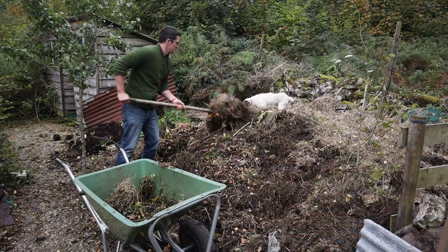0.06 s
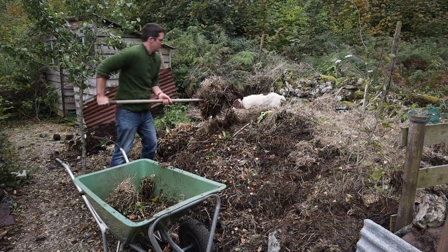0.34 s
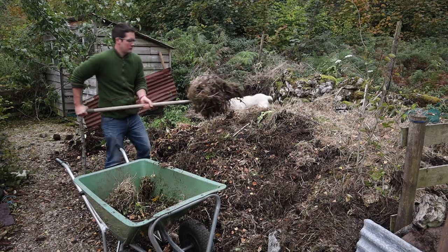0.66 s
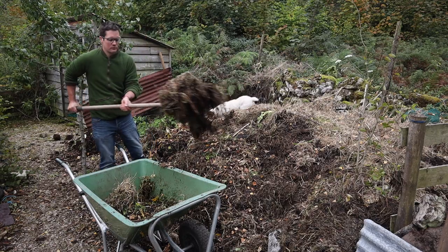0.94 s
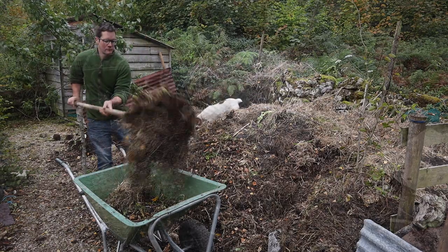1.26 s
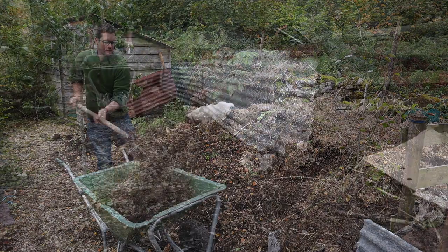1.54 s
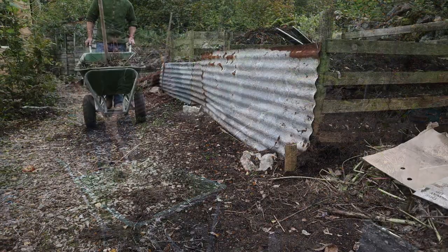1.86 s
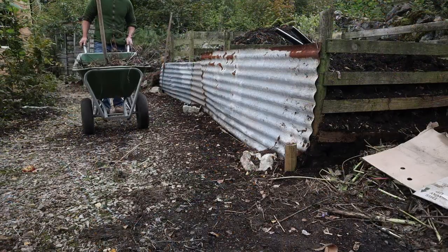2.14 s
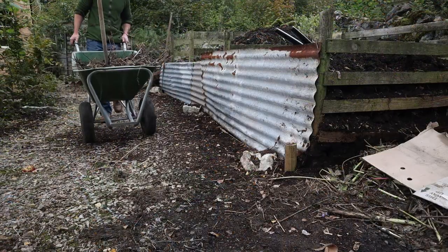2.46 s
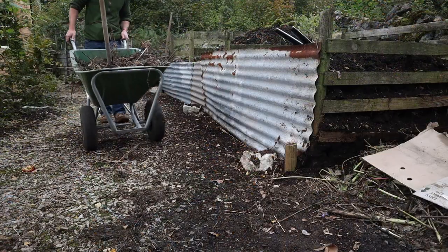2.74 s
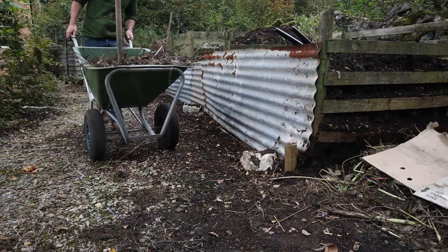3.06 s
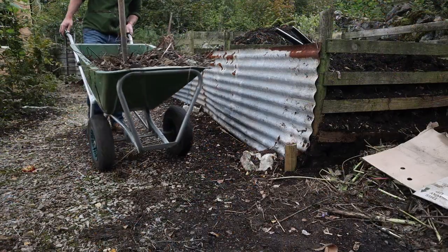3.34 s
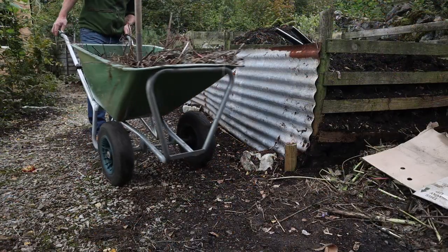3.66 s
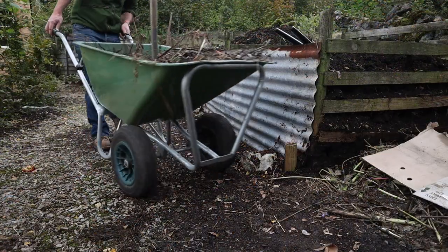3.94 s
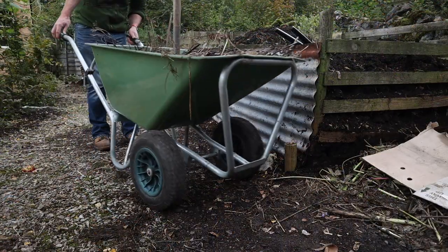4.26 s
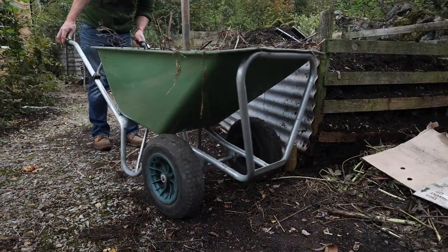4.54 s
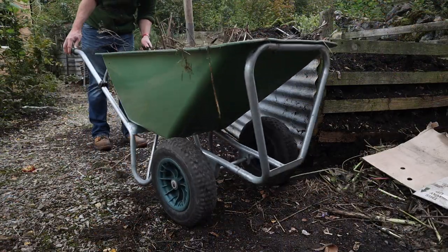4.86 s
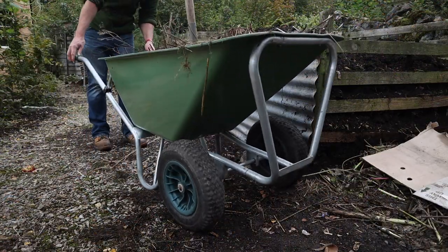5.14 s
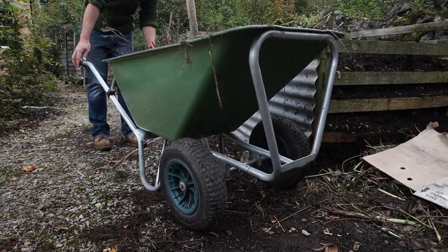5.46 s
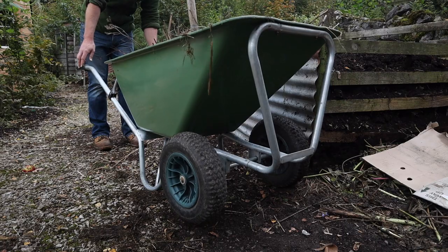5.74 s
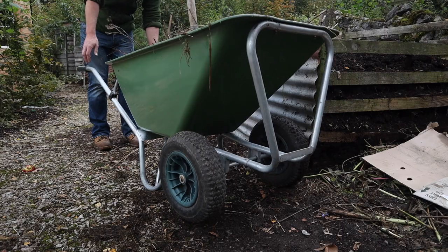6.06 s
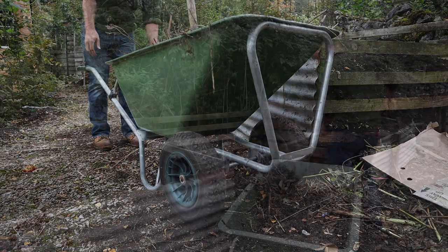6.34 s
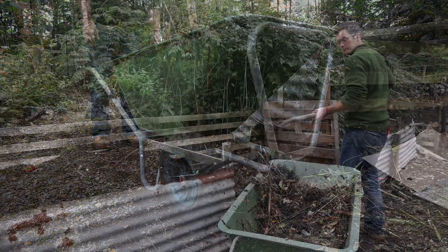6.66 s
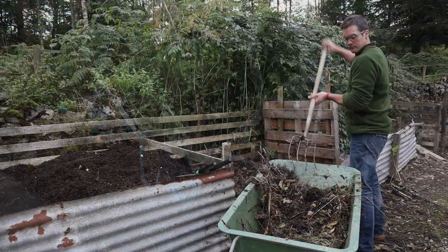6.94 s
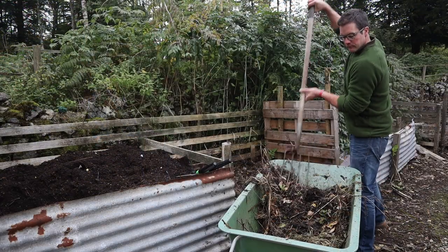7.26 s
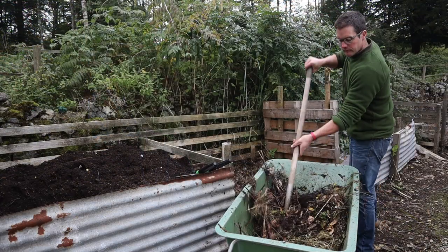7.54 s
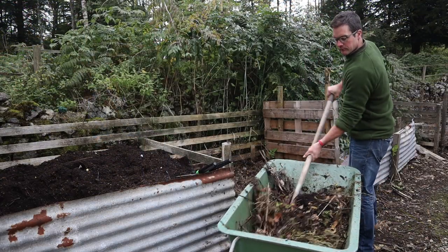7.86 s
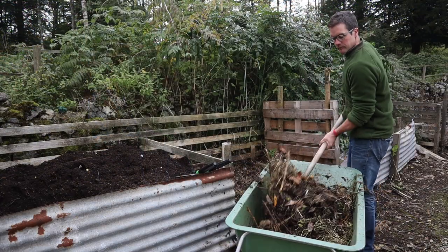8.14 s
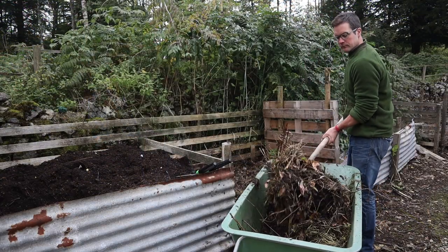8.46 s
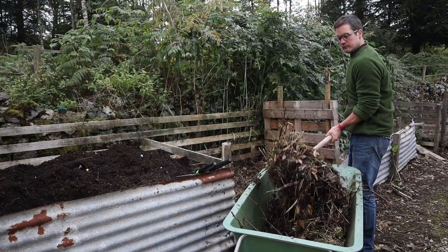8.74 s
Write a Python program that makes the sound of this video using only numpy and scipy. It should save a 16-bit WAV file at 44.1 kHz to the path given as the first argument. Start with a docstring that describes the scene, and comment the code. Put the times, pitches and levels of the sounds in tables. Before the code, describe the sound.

A soft, steady rush of outdoor air runs throughout, with the work sounding nearby. Dry twigs rustle and tick faintly, then at about 1.5 seconds clippings land in a plastic wheelbarrow with a cluster of hollow thuds. From 1.7 seconds the barrow rolls over gravel, its tub rumbling and stones crunching and popping under the tyres, loudest just before 4 seconds. Loose metal clinks around 2.3 and 3.3 seconds, and a bird gives one high chirp at 2.6. The rolling eases after 4.2 seconds, and a faint, distant whine wavers until about 7. Between 5.3 and 6 seconds the barrow settles with knocks, gritty scrapes, twig snaps and a clink. After a lull, a fork digs in at 7.3 seconds with a loud, booming thud on the tub. Twigs crackle and snap, with more scrapes and lighter knocks from 8 to 8.5 seconds.

```python
"""A plastic wheelbarrow is loaded with garden clippings, rolls up a gravel path and is set down.
Then the fork digs into the load. The tub thuds at each blow, stones crunch and pop under the tyres,
twigs rustle and snap, boots and fork scrape through grit, and loose metal clinks.
One high chirp and a faint, far whine sound over the steady rush of the open air."""
import sys
import numpy as np
from scipy import signal
from scipy.fft import rfft, irfft
from scipy.io import wavfile

SR = 44100
rng = np.random.default_rng(int(sys.argv[2]) if len(sys.argv) > 2 else 0)


def pcm_store(signal):
    """Save signal as 16-bit PCM."""
    levels = np.round(np.clip(np.atleast_2d(signal), -1, 1) * 32767)
    wavfile.write(sys.argv[1], SR, levels.astype(np.int16).T)


N = 388521
TIME = np.arange(N) / SR
HIT_TIME = TIME[:SR // 3]   # the clock for one short sound


def from_db(db):
    """Turn decibels into a number to multiply a sound by."""
    return 10 ** (np.asarray(db) / 20)


def rms_one(x):
    """Scale a sound so that its average strength (rms) is 1."""
    return x / np.sqrt(np.mean(x ** 2) + 1e-20)


def gain_curve(rows):
    """Join rows of (t/s, level/dB) into a volume curve, silent before and after them."""
    s, db = np.transpose(rows)
    return np.interp(TIME, s, from_db(db), left=0, right=0)


def dying(t60):
    """A fade that falls 60 dB in t60 seconds."""
    return np.exp(-np.log(1000) * HIT_TIME / max(t60, 1e-4))


def add(out, s, sound):
    """Mix a sound in at s seconds."""
    start = max(round(s * SR), 0)
    out[start:start + len(sound)] += sound[:N - start]


def butter(x, hz, kind, order=2):
    """Keep only the lows, the highs or a band of a sound."""
    sections = signal.butter(order, np.clip(hz, 10, .48 * SR), kind, fs=SR, output="sos")
    return signal.sosfilt(sections, x + 1e-18)


def drift(rate):
    """A random wobble of size about 1 that heads for a new value `rate` times a second."""
    knots = rng.standard_normal(N // 20)
    return np.interp(TIME * rate, np.arange(len(knots)), knots)


def coloured(x, spectrum):
    """Give a sound the tone colour in rows of (f/Hz, level/dB), at strength 1."""
    hz, db = np.transpose(spectrum)
    grid = np.linspace(1, SR / 2, 2049)
    gains = from_db(np.interp(np.log(grid), np.log(hz), db))
    cepstrum = irfft(np.log(gains))
    folded = 2 * cepstrum[:len(grid)]   # so the filter rings only after a click, never before
    folded[0] = 0
    response = irfft(np.exp(rfft(folded, len(cepstrum))))
    return rms_one(signal.oaconvolve(x, response)[:len(x)])


def grains(per_s, spread_db, low_hz, high_hz, cycles, bands=14):
    """Many tiny breaks of uneven size, each ringing briefly at its own pitch; strength 1."""
    born = rng.random(N) < per_s / SR
    clicks = born * rng.choice([-1, 1], N) * from_db(spread_db * np.minimum(rng.exponential(1, N), 4))
    band_of_click, out = rng.integers(0, bands, N), np.zeros(N)
    width = 1 + 1 / max(cycles, 1)
    for band, hz in enumerate(np.geomspace(low_hz, high_hz, bands)):
        out += butter(clicks * (band_of_click == band), [hz / width, hz * width], "band", order=1)
    return rms_one(out)


def struck(blows, tones, focus_db, rattle_share, uneven_db, detune):
    """Each blow rattles briefly and rings an object's own tones, most of all those near its pitch."""
    out = np.zeros(N)
    tone_hz, tone_db, t60 = np.transpose(tones)
    fades = np.array([dying(t) for t in t60])
    for s, level_db, centre_hz, rattle_s in blows:
        octaves_off = np.log2(tone_hz / centre_hz)
        luck_db = uneven_db * rng.standard_normal(len(tones))
        strength = from_db(tone_db - focus_db * octaves_off ** 2 + luck_db)
        # the load shifts and retunes the object
        detuned = tone_hz * (1 + detune * rng.standard_normal(len(tones)))
        waves = fades * np.sin(2 * np.pi * detuned[:, None] * HIT_TIME)
        ring = (strength * rng.choice([-1, 1], len(tones))) @ waves
        ring = butter(ring, min(centre_hz / 2, 150), "high", order=4)   # small things give no deep bass
        rattle = rng.standard_normal(len(HIT_TIME)) * dying(4 * rattle_s)
        contact = rattle_share * rattle / np.linalg.norm(rattle)
        contact[0] += 1
        sound = signal.fftconvolve(ring, contact)[:len(ring)]
        add(out, s, from_db(level_db) * rms_one(sound) * np.std(ring) / np.linalg.norm(strength))
    return out


def crack(scatter_db, scatter_t60):
    """One sharp break, then a scatter of bits that quickly dies away."""
    scatter = rng.standard_normal(len(HIT_TIME)) * rng.exponential(1, len(HIT_TIME)) * dying(scatter_t60)
    burst = from_db(scatter_db) * scatter / np.linalg.norm(scatter)
    burst[0] += 1
    return burst


def ticks(breaks, scatter_cycles=80, width=1.45):
    """Dry twigs and bits of grit break with a thin, bright tick; the higher, the shorter."""
    out = np.zeros(N)
    for s, level_db, hz in breaks:
        burst = crack(scatter_db=6.5, scatter_t60=scatter_cycles / hz)
        tick = butter(burst, [hz / width, hz * width], "band")
        add(out, s, from_db(level_db) * tick / np.linalg.norm(tick))
    return from_db(9) * out


def chance_events(drive, per_s, level_db, hz, spread_db, spread_octaves, slots=300):
    """Random rows of (t/s, level/dB, f/Hz); more drive makes them busier and louder (1 is as given)."""
    when, luck, size, pitch = rng.random((slots, 4)).T
    s = (np.arange(slots) + when) * TIME[-1] / slots
    strength = np.interp(s, TIME, drive)
    levels = level_db + 20 * np.log10(strength + 1e-9) + spread_db * (2 * size - 1)
    pitches = hz * 2 ** (spread_octaves * (2 * pitch - 1))
    happens = luck < per_s * strength * TIME[-1] / slots
    return list(np.c_[s, levels, pitches][happens])


# how loud the air is: t/s, level/dB
AIR_LEVELS = [(0, -47), (2.2, -45), (4.5, -49), (6.55, -48), (7.25, -44), (7.9, -41.5), (8.8, -44)]
# tone colour of the air: f/Hz, level/dB
AIR_TONE = [(25, -11), (87, -3.5), (145, -8.5), (280, -6), (440, -2.5), (620, -5.5), (1000, -2.5),
            (1750, -5), (3000, -18), (6000, -21), (8400, -21.5), (10500, -29), (16000, -27.5)]


def open_air(flutter_db=-0.1):
    """The even rush of the woods all around."""
    flutter = from_db(flutter_db * drift(39))
    return gain_curve(AIR_LEVELS) * flutter * coloured(rng.standard_normal(N), AIR_TONE)


# how loud the whine is: t/s, level/dB
WHINE_LEVELS = [(4.3, -51.5), (5, -59), (6.2, -56.5), (6.7, -63), (7.3, -76)]


def whine(hz=847, waver_hz=7, waver_db=7.1):
    """A thin, wavering tone far away."""
    phase = 2 * np.pi * np.cumsum(hz + waver_hz * drift(25)) / SR
    return gain_curve(WHINE_LEVELS) * from_db(waver_db * drift(7.4)) * np.sin(phase)


def yard_echo(x, t60):
    """Fences and bushes throw back a short echo."""
    tail = rng.standard_normal(len(HIT_TIME)) * dying(t60) * (HIT_TIME > .005)
    return signal.oaconvolve(x, tail / np.linalg.norm(tail))[:N]


# pitch of the chirp's lower tone: t/s, f/Hz
CHIRP_PITCH = [(2.62, 6650), (2.646, 7130), (2.657, 6680), (2.677, 7650), (2.695, 6440)]


def chirp(upper_hz=8130, lower_db=-5, overtone_db=-22, waver_hz=130, rough_db=3.5):
    """Two close, rough, wavering tones swell together and mix into faint higher tones."""
    start_db, swell_db_per_s, edge_s = -26, 131.5, 0.006
    s, lower_hz = np.transpose(CHIRP_PITCH)
    tones = np.zeros(N)
    for hz, level_db in ((np.interp(TIME, s, lower_hz), lower_db), (upper_hz, 0)):
        phase = 2 * np.pi * np.cumsum(hz + waver_hz * drift(750)) / SR
        tones += from_db(level_db + rough_db * drift(700)) * np.sin(phase)
    gate = np.clip(np.minimum(TIME - s[0], s[-1] - TIME) / edge_s, 0, 1)
    swell = from_db(start_db + swell_db_per_s * (np.clip(TIME, s[0], s[-1]) - s[0]))
    return gate * swell * (tones + from_db(overtone_db) * butter(tones ** 2, upper_hz, "high"))


# clinks of the fork and frame: t/s, level/dB, centre f/Hz, rattle/s
METAL_HITS = [(2.274, -19, 3400, 0.0019), (2.307, -25, 4970, 0.0043), (3.170, -16.5, 2000, 0.0075),
              (3.279, -6, 1300, 0.005), (5.836, -15, 9000, 0.011)]
# the tones the metal rings with: f/Hz, level/dB, time to fade by 60 dB/s
METAL_TONES = [(600, -0.5, .09), (1010, -4, 0.071), (1376, 9.5, 0.056), (1650, -9, 0.049), (2037, 7, 0.03),
               (3050, 7, 0.058), (3026, -0.5, 0.022), (3210, -10, 0.044), (4380, -5, 0.1), (5220, 6, 0.081),
               (5500, -15, 0.17), (5400, 6, 0.02), (5860, 1, 0.045), (6570, -18, .04), (6800, -7, 0.067),
               (6940, -12, .04), (7500, -2, .04), (7840, 3, 0.048), (8560, 0.5, 0.083), (8850, 2, 0.024),
               (9020, -6, 0.059), (10100, -7, .04), (10700, -26, 0.046), (11800, -19, .03),
               (12700, -11, .05)]


def metal_clinks():
    """Loose metal on the fork and frame rattles and rings."""
    ring = struck(METAL_HITS, METAL_TONES, focus_db=5, rattle_share=5, uneven_db=2, detune=0.012)
    return from_db(-2) * ring


# scrapes: t/s, level/dB, length/s, leaves compared with grit/dB
GRIT_SCRAPES = [(2.292, -27.5, 0.054, -30), (2.951, -27.5, 0.025, -19), (3.168, -31.5, 0.019, -23),
                (3.273, -24, 0.029, -15), (4.266, -34, 0.059, -6.5), (5.5, -46, 0.052, 3.5),
                (5.658, -38, 0.025, -1), (5.696, -31, 0.03, -11), (5.834, -43.5, 0.013, 12.5),
                (5.879, -41.5, 0.081, -1), (5.981, -32, 0.029, -11.5), (6.213, -49, 0.042, 3),
                (7.316, -36, 0.054, -8), (7.387, -26.5, 0.036, -14), (8.125, -32, 0.034, -16),
                (8.189, -22.5, 0.021, -16)]
# tone colour of crushed grit: f/Hz, level/dB
GRIT_TONE = [(150, -22.5), (300, -0.5), (600, 3.5), (1100, 0.5), (1800, -3), (2600, -9), (4000, -17.5),
             (7000, -24), (16000, -43)]
# tone colour of dry leaves and twigs: f/Hz, level/dB
TWIG_TONE = [(400, -55), (1200, 3), (2500, 4.5), (4000, 2), (6000, -2.5), (8300, 6.5), (10000, -8.5),
             (13000, -1), (16000, -9)]


def scrapes():
    """Boots and fork crush grit in short swells, with dry leaves hissing on top."""
    grit = coloured(grains(per_s=5000, spread_db=6.5, low_hz=314, high_hz=6450, cycles=2.4), GRIT_TONE)
    leaves = coloured(grains(per_s=3600, spread_db=3.5, low_hz=2000, high_hz=11500, cycles=3.4),
                      TWIG_TONE)
    out = np.zeros(N)
    for s, level_db, length_s, leaves_db in GRIT_SCRAPES:
        swell = np.interp(TIME, s + length_s * np.array([0, .2, .7, 1.3]), [0.00016, 0.98, 1, 0.0033])
        out += from_db(level_db) * swell * (grit + from_db(leaves_db) * leaves)
    return out


# the load is lifted, dropped, jolted or raked:
# t/s, rise/s, hold/s, time to fade by 20 dB/s, twig level/dB, drag level/dB
LOAD_HEAVES = [(-.1, 0.12, 0.18, 2.5, -51, -70), (0.956, 0.1, 0.52, 0.63, -55, -65.5),
               (1.461, 0.052, 0.064, 0.27, -35.5, -37.5), (5.263, 0.0082, 0.018, 0.58, -53.5, -38),
               (5.88, 0.018, 0.033, 0.86, -53.5, -48), (7.3, 0.012, 0.31, 0.18, -36.5, -36),
               (7.448, 0.034, 0.026, 0.19, -31, -35), (7.876, 0.11, 0.77, 0.48, -46, -44.5)]


def load_motion(pace, shake_db=-52, shake_follows=0.61):
    """How hard the twigs stir and drag on the tub, from each heave and from the bumpy ride."""
    stir, drag = from_db(shake_db) * pace ** shake_follows, 0
    for s, rise_s, hold_s, fade_s, twigs_db, drag_db in LOAD_HEAVES:
        rise = np.clip((TIME - s) / rise_s, 0, 1)
        heave = rise * from_db(-20 * np.maximum(TIME - s - rise_s - hold_s, 0) / fade_s)
        stir = np.hypot(stir, from_db(twigs_db) * heave)
        drag = np.hypot(drag, from_db(drag_db) * heave)
    return stir, drag


# tone colour of twigs dragging on the tub: f/Hz, level/dB
DRAG_TONE = [(25, -22), (80, -14), (180, 4), (320, 2), (650, -4.5), (1300, -7), (3000, -16)]


def clippings(stir, drag):
    """Countless twigs and leaves crackle in clumps; dragged along the tub they also grumble."""
    crackle = grains(per_s=3200, spread_db=2, low_hz=1210, high_hz=15600, cycles=1.4)
    grumble = grains(per_s=1300, spread_db=4.5, low_hz=100, high_hz=2500, cycles=0.44)
    clumps = from_db(3.35 * np.tanh(drift(70)))
    return clumps * (stir * coloured(crackle, TWIG_TONE) + drag * coloured(grumble, DRAG_TONE))


# the loudest twigs snapping: t/s, level/dB, centre f/Hz
BIG_SNAPS = [(0.0174, -12, 10100), (0.4213, -24.5, 7500), (0.6387, -20, 7000), (1.1617, -24, 6540),
             (1.5233, -9, 3150), (3.0173, -23.5, 7500), (3.283, -9, 5160), (3.5255, -22, 9000),
             (3.7886, -11.5, 4600), (3.879, -17, 7500), (4.0279, -21, 7300), (4.2754, -20.5, 10000),
             (5.241, -25.5, 7850), (5.452, -25, 6900), (5.603, -17.5, 2600), (5.6545, -22, 5140),
             (5.7367, -22, 4670), (5.837, -12, 8500), (5.9935, -19.5, 5500), (6.2238, -27, 8900),
             (7.404, -12, 2900), (7.4386, -19, 7210), (7.8552, -24.5, 7650), (8.144, -19, 6440),
             (8.193, -13, 8350), (8.728, -23.5, 6800)]


def twig_snaps(stir, blows, brisk_stir_db=-45, break_growth=2.2):
    """Twigs snap as the load stirs and under each blow on the tub; harder blows snap them louder."""
    drive = np.tanh(stir / from_db(brisk_stir_db)) ** .5
    small = chance_events(drive, per_s=7, level_db=-30, hz=7500, spread_db=7, spread_octaves=0.54)
    crushed = [(s, break_growth * knock_db - 0.5, hz) for s, knock_db, *_ in blows for hz in (2900, 6300)]
    return ticks(BIG_SNAPS + crushed + small)


def stone_pops(pops, tyre_cut_hz=2500, grind_db=-10, scatter_db=-5, width=1.5):
    """A stone grinds under a tyre, then shoots out with a hollow pop, dulled by the rubber."""
    out, lead = np.zeros(N), SR // 40
    for s, level_db, hz in pops:
        crumble_db = -level_db / 5   # small stones crumble rather than pop
        grind = (rng.standard_normal(lead) * dying(0.028)[:lead])[::-1]   # swells up to the pop
        grind = from_db(grind_db + crumble_db) * grind / np.linalg.norm(grind)
        push = np.r_[grind, crack(scatter_db + crumble_db, scatter_t60=.05)]
        pop = butter(push, [hz / width, hz * width], "band", order=1)
        pop = butter(pop, tyre_cut_hz, "low", order=3)
        pop = butter(pop, 120, "high")
        add(out, s - lead / SR, from_db(level_db) * pop / np.linalg.norm(pop))
    return from_db(14) * out


# the biggest stones popping from under the tyres: t/s, level/dB, f/Hz
BIG_POPS = [(1.3488, -23.5, 1300), (1.8325, -19, 1330), (1.856, -21, 1800), (1.984, -17.5, 1150),
            (2.0738, -17.5, 890), (2.2224, -20.5, 1420), (2.363, -13.5, 990), (2.4668, -15, 870),
            (2.8072, -15, 1590), (2.9059, -13.5, 1030), (2.9942, -11, 895), (3.1727, -16.5, 1330),
            (3.3654, -10.5, 1380), (3.3976, -12.5, 1060), (3.5466, -13, 1080), (3.579, -10.5, 1290),
            (3.7893, -5, 1070), (3.8031, -4, 1130), (3.8775, -2.5, 805), (3.914, -6.5, 1150),
            (4.3499, -17.5, 1060), (4.8758, -26, 1780), (4.9606, -25.5, 1110), (5.1612, -23.5, 890),
            (5.228, -21, 980), (5.603, -18.5, 1140), (5.6543, -16, 760), (5.7367, -17, 1010)]


def loose_stones(pace, jostle_s=.028, jostle_db=-14, tick_db=-19, tick_growth=0.62, tick_ratio=2.87):
    """Stones pop and tick as the barrow rolls; each big one also jostles two neighbours."""
    small = chance_events(pace ** 0.74, per_s=12, level_db=-21, hz=1150, spread_db=5, spread_octaves=0.21)
    pops = BIG_POPS + small
    jostled = [(s + jostle_s * lag, level_db + jostle_db, hz)
               for s, level_db, hz in BIG_POPS for lag in rng.uniform(0.18, 1, 2)]
    bright = [(s, tick_db + tick_growth * level_db, hz * tick_ratio) for s, level_db, hz in pops]
    return stone_pops(pops + jostled) + ticks(bright)


# blows on the tub: t/s, knock level/dB, centre f/Hz, rattle/s, boom level/dB
TUB_HITS = [(1.493, -18, 563, 0.012, -30), (1.526, -5.5, 970, 0.0023, -26),
            (1.566, -16, 600, 0.0043, -20.5), (1.586, -15, 340, 0.0029, -23),
            (1.661, -19, 560, 0.0041, -20), (3.788, -14, 720, .002, -15), (3.879, -14, 700, 0.0022, -15),
            (4.282, -21, 800, 0.026, -23), (4.303, -13, 740, 0.0022, -16.5),
            (5.295, -13.5, 550, 0.049, -15.5), (5.329, -24.5, 318, .015, -18.5),
            (5.371, -21, 1100, 0.017, -31), (5.507, -22.5, 448, 0.026, -30), (5.891, -17, 490, 0.0071, -26),
            (5.925, -25.5, 430, 0.025, -26), (6.023, -17.5, 480, 0.0054, -24.5),
            (7.309, -3.5, 860, 0.004, -3), (7.352, -18, 500, 0.0085, -28), (7.388, -13.5, 730, .014, -31),
            (8.008, -21, 520, 0.044, -22), (8.125, -21, 420, 0.05, -23.5), (8.193, -15, 480, 0.019, -22),
            (8.482, -13.5, 940, 0.003, -15), (8.774, -43, 517, 0.0031, -27.5)]
# the tones the plastic tub rings with: f/Hz, level/dB, time to fade by 60 dB/s
TUB_TONES = [(80, -17, 0.75), (114, -16, 0.15), (130.7, 1, 0.13), (171.7, -4, 0.15), (209.4, -11, 0.091),
             (223, -8.5, 0.066), (288.3, 0, 0.092), (342.5, -4.5, 0.1), (420, -8, 0.12),
             (507.5, -0.5, 0.087), (610.5, -2, 0.14), (686, -2, 0.094), (782, -4.5, 0.064),
             (890, -15, 0.18), (1003, 3.5, 0.045), (1176, -4.5, 0.063), (1280, -8.5, 0.12),
             (1346, 12.5, 0.0097), (1595, -7, 0.073), (1850, 3.5, 0.037), (2120, 2.5, 0.02),
             (2420, 2.5, 0.021)]


def tub_thuds(boom_lag_s=.0015, boom_ratio=0.39):
    """Each blow knocks on the wall of the tub, then the whole tub booms at a lower pitch."""
    knocks = [(s, knock_db, hz, rattle_s) for s, knock_db, hz, rattle_s, _ in TUB_HITS]
    booms = [(s + boom_lag_s, boom_db, boom_ratio * hz, rattle_s)
             for s, _, hz, rattle_s, boom_db in TUB_HITS]
    wall = struck(knocks, TUB_TONES, focus_db=3, rattle_share=1, uneven_db=2, detune=0.005)
    body = struck(booms, TUB_TONES, focus_db=3.5, rattle_share=0.57, uneven_db=0.1, detune=0.005)
    return from_db(-2) * wall + from_db(-0.5) * body


# how hard the barrow rolls and settles: t/s, level/dB (0 is full pace)
BARROW_PACE = [(1.5, -31), (1.7, 1), (1.9, -6), (2.3, -3.5), (2.95, 1.5), (3.2, -2.5), (3.55, 0.5),
               (4.05, -0.5), (4.25, -9.5), (4.8, -8.5), (5.05, -14), (5.55, -8), (6.0, -11), (6.45, -21)]
# tone colour of the shaking tub: f/Hz, level/dB
RUMBLE_TONE = [(25, -22), (55, -5), (100, -3), (160, 2.5), (280, -1.5), (450, -7), (900, -24)]


def rolling(pace, crunch_db=-38.5, rumble_db=-42, rumble_follows=0.68):
    """Tyres crush gravel in uneven clumps, and the shaking makes the tub rumble."""
    gravel = grains(per_s=1600, spread_db=3.2, low_hz=288, high_hz=4780, cycles=4.7)
    bumps = grains(per_s=830, spread_db=3, low_hz=59.6, high_hz=700, cycles=2.9)
    clumps = np.tanh(drift(45))
    crunch = from_db(crunch_db + 3.9 * clumps) * pace * coloured(gravel, GRIT_TONE)
    rumble = from_db(rumble_db + 2 * clumps) * pace ** rumble_follows * coloured(bumps, RUMBLE_TONE)
    return crunch + rumble


def scene():
    """The air and the whine, with the nearby sounds of the yard and their echo on top."""
    pace = gain_curve(BARROW_PACE)
    stir, drag = load_motion(pace)
    background = open_air() + whine()
    nearby = metal_clinks() + tub_thuds() + scrapes() + rolling(pace) + clippings(stir, drag)
    nearby += chirp() + loose_stones(pace) + twig_snaps(stir, TUB_HITS)
    return (background + nearby + from_db(-13.5) * yard_echo(nearby, t60=0.21))[None]


def record(dry, stop_hz=16700):
    """The loudest peaks are flattened and the very highest treble is cut."""
    treble_cut = signal.cheby2(16, 60, stop_hz, fs=SR, output="sos")
    return signal.sosfilt(treble_cut, np.clip(dry, -1, 1))


dry = scene()
out = record(dry)
pcm_store(out)
```